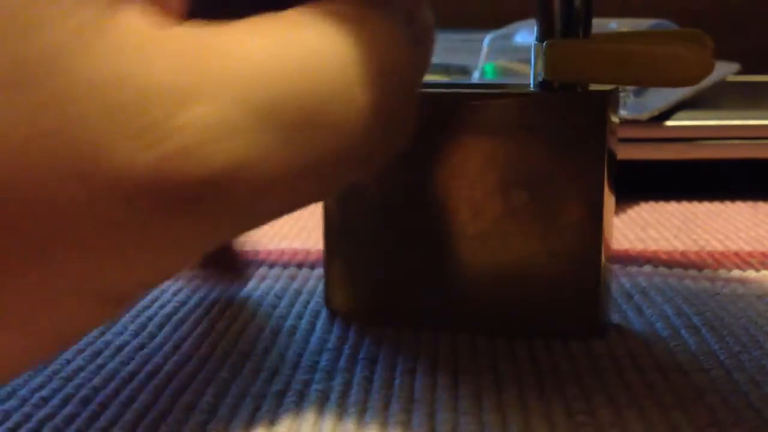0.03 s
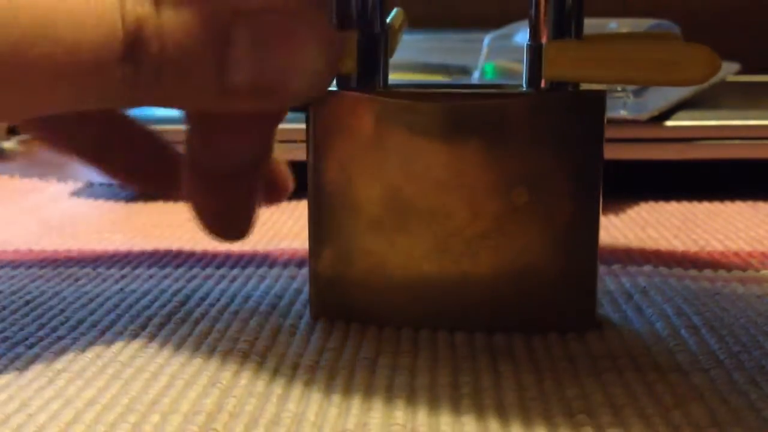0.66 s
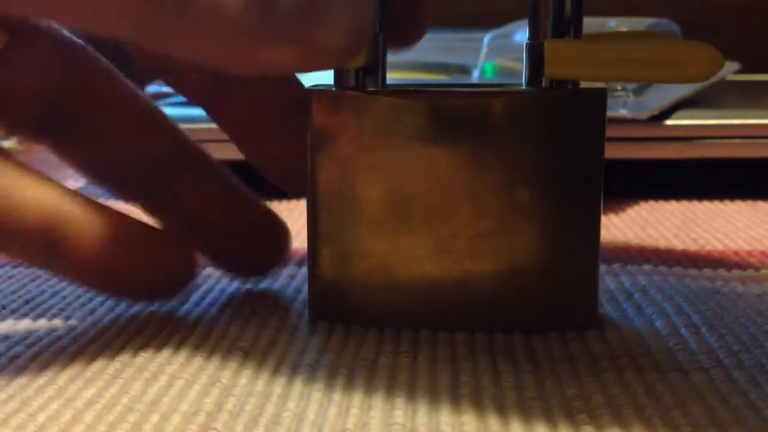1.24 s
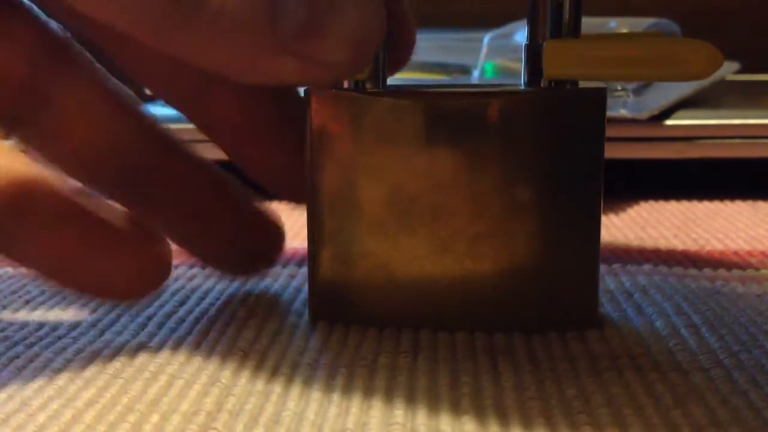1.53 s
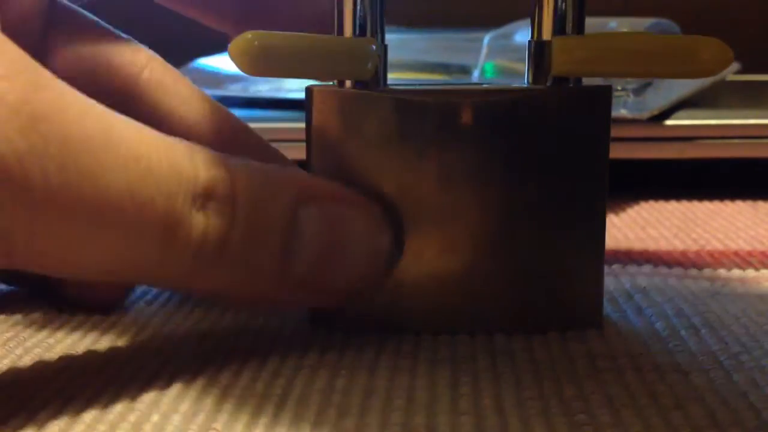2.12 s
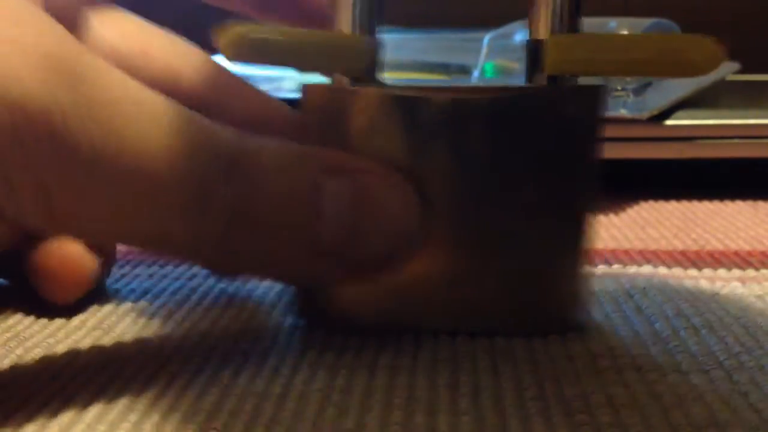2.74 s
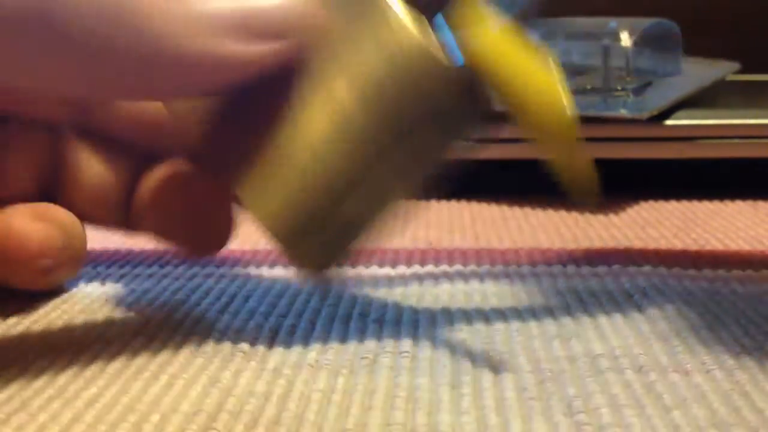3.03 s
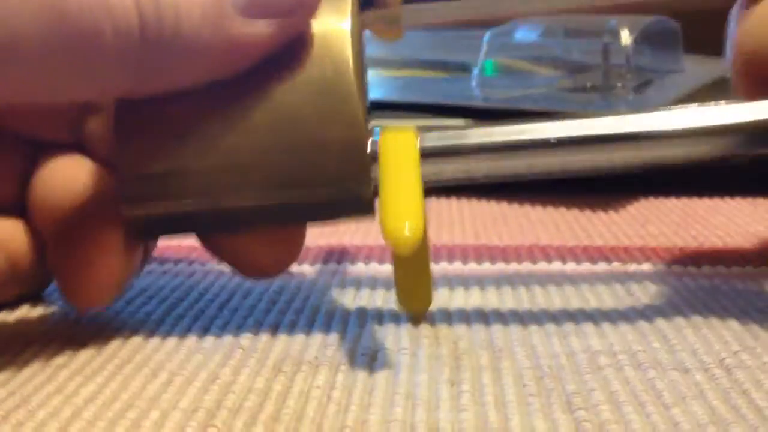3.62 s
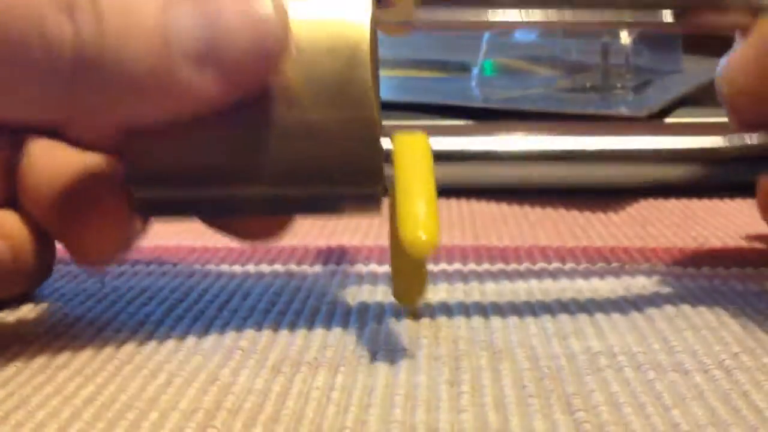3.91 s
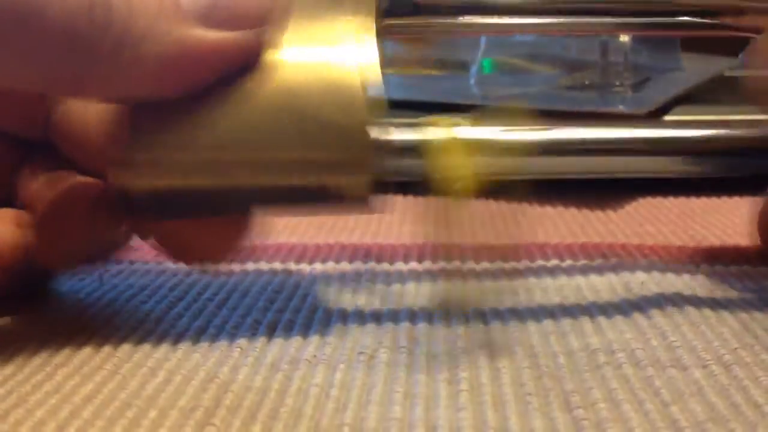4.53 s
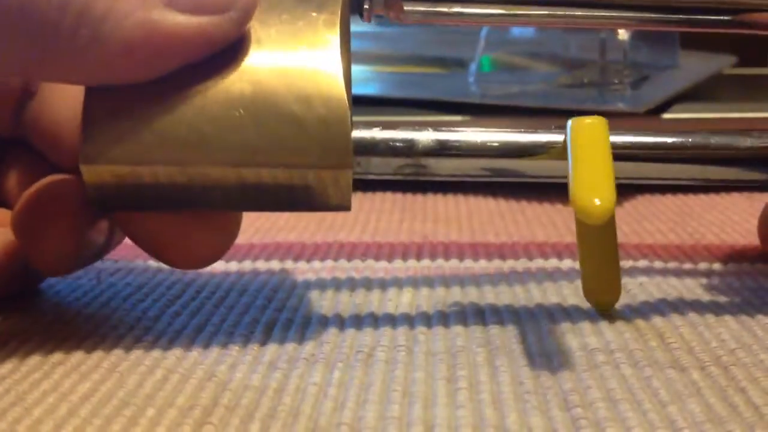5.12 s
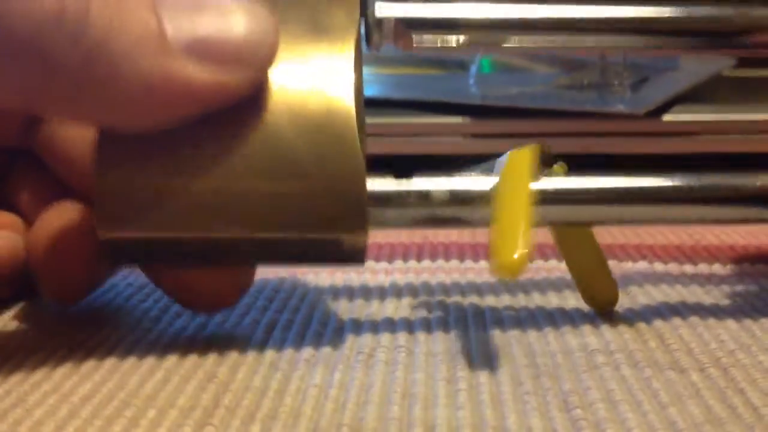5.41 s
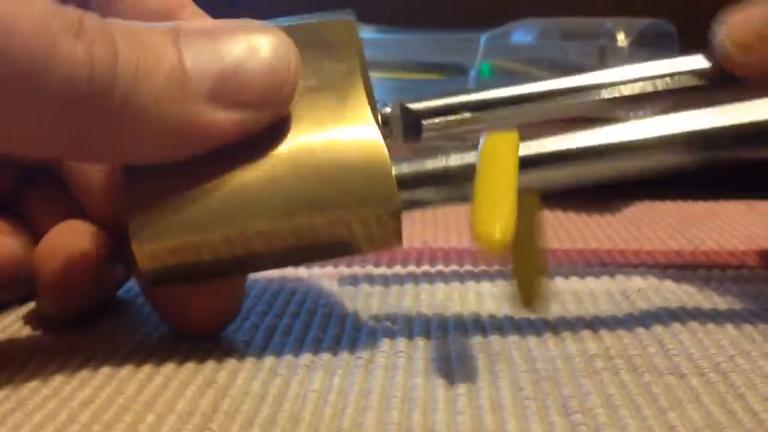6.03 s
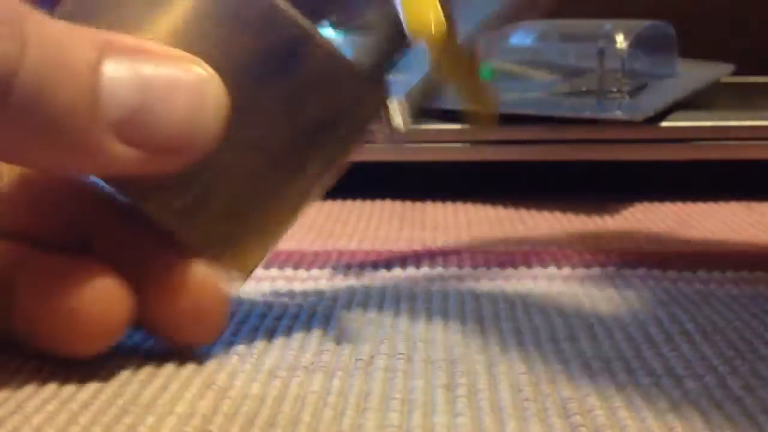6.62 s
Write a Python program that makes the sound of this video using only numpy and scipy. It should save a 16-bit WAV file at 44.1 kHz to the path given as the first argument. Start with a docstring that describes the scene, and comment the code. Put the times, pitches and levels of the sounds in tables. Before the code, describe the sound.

Steel picks click and scrape inside a brass padlock until the shackle snaps open with a loud, briefly ringing clang.

```python
"""A brass padlock is picked close up until its sprung shackle snaps open, clangs and rings.
Before that, thin steel tools tick and scrape inside it and the pulled shackle creaks.
The lock body knocks and drags on a woven mat on a desk; skin slides over metal and cloth.
Underneath lies quiet room tone, which a limiter ducks on the snap and slowly lets back."""
import sys
import numpy as np
from scipy import signal
from scipy.io import wavfile
from scipy.ndimage import uniform_filter1d

SR = 44100
rng = np.random.default_rng(int(sys.argv[2]) if len(sys.argv) > 2 else 0)


def persist_wave(psi):
    """Save psi, clipped to +-1, as 16-bit WAV."""
    counts = np.round(np.clip(psi, -1, 1) * 32767).astype(np.int16)
    wavfile.write(sys.argv[1], SR, np.atleast_2d(counts).T)


N = 298116
LIFT_S = 2.8  # the lock leaves the mat


def amp(db):
    """Decibels to gain."""
    return 10 ** (np.asarray(db) / 20)


def unit_rms(x):
    """Scales to an rms of one."""
    return x / np.sqrt(np.mean(x ** 2) + 1e-20)


def curve_at(points, hz):
    """Reads a curve on a log-frequency axis."""
    f, value = np.transpose(points)
    return np.interp(np.log(hz + 1), np.log(f + 1), value)


def add(mix, s, sound):
    """Mixes a sound in at time s."""
    part = mix[round(s * SR):][:len(sound)]
    part += sound[:len(part)]


def equalise(x, eq, tilt=0, size=2048):
    """Minimum-phase EQ, its treble tilted in dB per octave."""
    hz = abs(np.fft.fftfreq(size, 1 / SR))
    log_gain = np.log(amp(curve_at(eq, hz) + tilt * np.log2(1 + hz / 1000)))
    response = np.exp(np.conj(signal.hilbert(log_gain)))
    return signal.oaconvolve(x, np.fft.ifft(response).real[:size // 2])


def burst(decay_s, eq, tilt=0, size=4096):
    """A hard hit: countless modes dying at once, with the energy of one millisecond at unit level."""
    t = np.arange(size) / SR
    x = equalise(rng.choice([-1., 1.], size) * np.exp(-t / decay_s), eq, tilt)
    return x / np.linalg.norm(x) * np.sqrt(SR / 1000)


def ring(modes):
    """Damped sines of a struck object: low modes start from rest, high ones at any phase."""
    t = np.arange(SR // 2) / SR
    return sum(amp(db - 60 * t / t60) * np.sin(2 * np.pi * (hz * t + (hz > 1000) * rng.random()))
               for hz, db, t60 in modes)


def noise(eq, patchy_db):
    """Noise of unit level whose spectrum drifts in small patches."""
    hz = np.fft.rfftfreq(1024, 1 / SR)
    real, imag, patches = rng.standard_normal((3, len(hz), N // 256 + 5))
    patches = uniform_filter1d(patches, size=20, axis=0)
    patches = unit_rms(uniform_filter1d(patches, size=7, axis=1))
    bins = (real + 1j * imag) * amp(curve_at(eq, hz)[:, None] + patchy_db * patches)
    return unit_rms(signal.istft(bins, nperseg=1024, noverlap=768)[1][:N])


def swells(moves, peak, curve):
    """Friction envelope: each move speeds up for the share `peak` of its length, then slows to rest."""
    out = np.zeros(N)
    for start, length, db in moves:
        progress = (np.arange(max(start, 0), start + length, 1 / SR) - start) / length
        speed = abs(np.sin(np.pi * np.interp(progress, [0, peak, 1], [0, .5, 1])))
        add(out, max(start, 0), amp(db) * speed ** curve)
    return out


# low, airy bed (f/Hz, level/dB)
ROOM_TONE_EQ = [(30, -10), (80, -10), (120, 4), (200, 1), (260, -4), (335, 1.5), (450, -4), (780, -12),
                (1300, -10), (2600, -15.5), (6300, -20), (8000, -22), (10000, -26.5), (13000, -22.5)]

def room_tone(level_db=-68):
    """The still room and the microphone's hiss."""
    return amp(level_db) * noise(ROOM_TONE_EQ, patchy_db=0)


# reverb time by band (f/Hz, t60/s)
REVERB_TIMES = [(150, 0.74), (1000, 0.32), (4000, .27), (9000, .24), (15000, .19)]

def reverb(x, build_s=0.0028):
    """Diffuse tail of a small furnished room, the treble dying first."""
    hz, t, bins = signal.stft(rng.standard_normal(SR // 2), SR, nperseg=256)
    decay = amp(-60 * t / curve_at(REVERB_TIMES, hz)[:, None])
    tail = signal.istft(bins * decay, SR, nperseg=256)[1]
    tail *= 1 - np.exp(-(np.arange(len(tail)) / SR / build_s) ** 2)
    return signal.fftconvolve(x, tail / np.linalg.norm(tail))[:N]


def reflections(x, delay_s=.0074, bounce_db=-7, dull_hz=1300):
    """A nearby surface throws the lows back, twice."""
    dull = signal.sosfilt(signal.butter(2, dull_hz, fs=SR, output="sos"), x)
    out = np.zeros(N)
    for trip in (1, 2):
        add(out, trip * delay_s, (-amp(bounce_db)) ** trip * dull)
    return out


# finger strokes over the brass (t/s, length/s, relative level/dB, fizz boost/dB)
STROKES = [(-.04, .15, -60.5, 3), (.11, .1, -70.5, -4), (1.03, .07, -71, 0), (1.13, .09, -66.5, 2),
           (1.21, .11, -67.5, 1), (1.63, .15, -59.5, 1), (1.76, .14, -67.5, 0), (1.93, .13, -66.5, 1),
           (2.03, .115, -58, 2), (2.27, .19, -66, -2), (2.575, .05, -67, 0), (2.66, .1, -69.5, -3),
           (2.78, .07, -72, -4), (2.85, .21, -63, -8), (3.12, .13, -68, -5), (3.25, .15, -71, -7),
           (3.405, .06, -57.5, 0), (3.45, .06, -64, -1), (3.53, .21, -65, -1), (3.73, .12, -71, -6),
           (3.83, .1, -66.5, -2), (3.93, .2, -70, -2), (4.15, .45, -76, -4), (5.3, .48, -76, -6),
           (6.18, .11, -67.5, -3), (6.33, .08, -69, -3), (6.49, .18, -62.5, -4), (6.68, .11, -70, -3)]
# bright hiss of skin on brass (f/Hz, level/dB)
SKIN_EQ = [(530, -40), (900, -4.5), (1260, -1), (1590, -9), (2720, -2.5), (3300, -4), (4710, -2),
           (5500, -3.5), (8200, -4.5), (10500, -9), (13600, -9), (15500, -14.5)]
# shifts of the grip (t/s, length/s, level/dB)
REGRIPS = [(-.08, .25, -62.5), (1.5, .42, -65), (2.03, .13, -66.5), (2.24, .3, -67.5), (2.48, .3, -63.5),
           (3.18, .36, -67), (3.52, .25, -62.5), (3.84, .33, -67.5), (5.22, .36, -70.5), (5.82, .88, -69.3)]
# dry cloth rustle of the grip (f/Hz, level/dB)
CLOTH_EQ = [(60, -32), (130, -3), (330, 4), (600, -0.5), (1100, -8), (2100, -6.5), (3000, -14),
            (6500, -15.5), (10000, -24.5), (15000, -28.5)]

def hand(slide_db=-1, rest_db=-72.5, grain_db=1.5, fizz_hz=9000):
    """Skin hisses on brass and rustles on the weave, catching unevenly."""
    catching = amp(grain_db * unit_rms(uniform_filter1d(rng.standard_normal(N), size=130)))
    skin = noise(SKIN_EQ, patchy_db=1)
    slide = np.zeros(N)
    for band in ("low", "high"):  # hiss below the crossover, dry fizz above
        layer = signal.sosfilt(signal.butter(5, fizz_hz, band, fs=SR, output="sos"), skin)
        moves = [(s, length, db + (band == "high") * boost) for s, length, db, boost in STROKES]
        slide += layer * swells(moves, peak=.56, curve=.75)
    grip_gain = np.hypot(swells(REGRIPS, peak=.55, curve=.8), amp(rest_db))
    rustle = grip_gain * noise(CLOTH_EQ, patchy_db=3)
    return catching * (amp(slide_db) * slide + rustle)


# pushes of the lock across the mat (t/s, length/s, level/dB)
DRAGS = [(1.41, .135, -46.5), (1.53, .14, -58.5)]
# muffled rub of the weave (f/Hz, level/dB)
MAT_EQ = [(110, -6), (200, 8), (300, -2), (700, -2.5), (1000, -12), (1500, -10.5), (2000, -28), (4000, -44),
          (15000, -55)]

def mat_drags():
    """The base of the lock rubs over the ribs of the mat."""
    return swells(DRAGS, peak=.6, curve=.7) * noise(MAT_EQ, patchy_db=3)


# dull thuds on the mat and in the hand; the rows at 4.7535 and 4.761 s strengthen the throw-back of the 4.7456
# s blow from a nearby surface (t/s, level/dB, f/Hz)
KNOCKS = [(.2428, -39, 553), (.293, -41, 520), (.3214, -38, 500), (.3335, -37, 500), (.395, -36, 500),
          (.414, -31, 417), (.622, -47, 220), (1.1705, -40, 185), (1.4107, -33, 560), (1.4384, -27, 490),
          (1.4669, -30.5, 600), (1.4843, -26, 580), (1.513, -36, 480), (1.5594, -32.5, 680),
          (1.843, -46, 168), (1.875, -50, 130), (3.4374, -37, 330), (3.459, -45, 300), (3.691, -46, 277),
          (4.616, -22, 140), (4.7456, -27, 480), (4.7535, -29, 500), (4.761, -36, 500), (4.8828, -34, 480),
          (4.9246, -24, 300), (4.949, -42, 340)]
# boom of the desk top (f/Hz, relative level/dB, t60/s)
DESK_MODES = [(127, -25, 0.18), (199.8, -17, 0.15), (395, -22, 0.15), (512, -20, 0.12), (654, -26, 0.11)]

def body_knocks(rise_cycles=0.51):
    """Each cushioned blow is a swing or two of pressure; while the lock stands, the desk rings too."""
    out, t = np.zeros(N), np.arange(SR // 2) / SR
    for s, db, hz in KNOCKS:
        rise = t * hz / rise_cycles
        blow = -(rise * np.exp(1 - rise)) ** 2 * np.sin(2 * np.pi * hz * t)
        add(out, s, amp(db) * (blow + (s < LIFT_S) * ring(DESK_MODES)))
    return out


# resonances that voice the creak (f/Hz, width/Hz, relative level/dB)
CREAK_BANDS = [(662, 130, 0), (1060, 80, -9), (1500, 70, -8), (1820, 190, -4), (3070, 220, -6)]

def shackle_creak(start_s=3.592, length_s=.112, level_db=-52.5, slips_per_s=700, spread_db=3):
    """The pulled shackle sticks and slips against the tools; each slip rings the lock."""
    slips = (rng.random(N) < slips_per_s / SR) * amp(spread_db * rng.standard_normal(N))
    voice = sum(amp(db) * signal.lfilter(*signal.iirpeak(hz, hz / width, fs=SR), slips)
                for hz, width, db in CREAK_BANDS)
    return swells([(start_s, length_s, level_db)], peak=.5, curve=.4) * unit_rms(voice)


# gritty tool slides (start t/s, end t/s, level/dB, tilt/(dB/octave), squeak f/Hz, squeak boost/dB)
SCRAPES = [(.218, .306, -57, -.5, 525, 14), (.287, .397, -48, -.5, 530, 12),
           (.391, .432, -43.5, -1, 453, 4), (.426, .486, -56, -.5, 1200, -4),
           (.613, .654, -46, -1, 1300, 8), (2.278, 2.725, -74.5, 0, 2100, 30),
           (2.575, 2.644, -68.5, -6, 2170, 15)]
# midrange rasp of sliding steel (f/Hz, level/dB)
SCRAPE_EQ = [(120, -14), (300, -7), (560, 1), (700, 1), (840, -6), (1050, 0.5), (1450, 0), (1620, -7),
             (1870, -1), (2400, -13), (3100, -6), (4200, -19), (8000, -28), (15000, -28)]

def tool_scrapes(slips_per_s=2200, spread_db=3, squeak_q=9):
    """Steel on steel: dense uneven slips ring the lock body and one resonance of the sliding part."""
    out = np.zeros(N)
    slips = (rng.random(N) < slips_per_s / SR) * rng.choice([-1, 1], N)
    slips = slips * amp(spread_db * rng.standard_normal(N))
    for start, end, db, tilt, squeak_hz, squeak_db in SCRAPES:
        n = int((end - start) * SR)
        grit = slips[round(start * SR):][:n] * signal.windows.tukey(n, .22)
        rasp = equalise(grit, SCRAPE_EQ, tilt)
        squeak = signal.lfilter(*signal.iirpeak(squeak_hz, squeak_q, fs=SR), rasp)
        scrape = rasp + amp(squeak_db) * squeak
        add(out, start, amp(db) * scrape * np.sqrt(n / (np.sum(scrape ** 2) + 1e-20)))
    return out


# tiny metal contacts of tools and lock (t/s, level/dB, tilt/(dB/octave))
TICKS = [(.1975, -43.5, -3), (.2313, -45, -8), (.2426, -34, -3.2), (.2703, -40.5, -4), (.2932, -39.5, -5),
         (.3027, -36.5, -1), (.3108, -31, 4), (.3173, -31.5, 1), (.321, -32.5, .5), (.3274, -32, 1),
         (.3328, -35, .5), (.3488, -42, -3), (.368, -35, 4), (.3783, -27, .7), (.385, -36, 1),
         (.394, -30, 0), (.3973, -33, 2), (.4003, -36, 3), (.4137, -35, 0), (.4515, -36.5, -6),
         (.5747, -51.5, -2.5), (.6206, -43, -4), (.6398, -47.5, -2.5), (.979, -42.5, 0), (3.004, -59, -3),
         (3.2148, -55, -5), (3.4374, -46, -1), (3.4584, -51, -3), (3.57, -47.5, -6), (4.8814, -44, -4)]
# crisp steel click (f/Hz, level/dB)
TICK_EQ = [(100, -16), (250, -5.5), (700, 2), (1500, 1), (1850, 1.5), (2500, -1.5), (3500, 0), (5200, -2),
           (8000, 0.5), (10500, -6.5), (13500, -7), (15500, -1)]
# plastic handles bumping the lock (t/s, level/dB)
HANDLE_TAPS = [(1.56, -48), (3.608, -45), (4.748, -33.5), (4.882, -35), (4.9239, -32.5), (5.0617, -56),
               (5.0837, -55), (5.168, -57.5), (5.273, -51.5), (5.3204, -51.5), (5.5796, -53.5)]
# hollow knock of a handle (f/Hz, level/dB)
HANDLE_EQ = [(150, -10.5), (500, 0.5), (1000, -0.5), (1600, 1), (2600, -7.5), (3800, -13.5), (5500, -25),
             (9000, -36), (15000, -46)]

def tool_ticks(tick_decay_s=.0011, tap_decay_s=.0012):
    """Tools catch in the lock and their handles tap it, all damped by the fingers."""
    out = np.zeros(N)
    for s, db, tilt in TICKS:
        add(out, s, amp(db) * burst(tick_decay_s, TICK_EQ, tilt))
    for s, db in HANDLE_TAPS:
        add(out, s, amp(db) * burst(tap_decay_s, HANDLE_EQ))
    return out


# attack: the latch lets go and the shackle slides out (t/s, level/dB, decay/s, tilt/(dB/octave))
LATCH_CRACKS = [(4.6072, -21.5, 0.0011, 1.5), (4.608, -2.5, .0013, .5), (4.6102, -2.5, .001, 1.5),
                (4.6131, -8, .002, 0.5), (4.616, 2, .004, -3)]
# hard, bright edge of the latch (f/Hz, level/dB)
LATCH_EQ = [(80, -30), (150, -13), (400, -9), (800, -9), (1100, 2.5), (2000, -0.5), (4500, 0.5), (6100, -1),
            (7500, 4), (9500, -1), (11000, -4.5), (13300, 3.5), (15000, 4.5)]
# body: clusters of fast-dying modes as the shackle chatters on its stop (f/Hz, level/dB)
CLANG_EQ = [(130, -15), (800, -14), (1300, -1), (1600, -7), (2900, -13), (3520, 2.5), (4200, -9.5),
            (5350, -9), (5580, 8), (5850, -8.5), (6300, -17), (7800, -9), (8500, 0), (9500, -19.5),
            (10120, -2.5), (10800, -23.5), (12000, -14), (12480, -3), (13000, -10), (15000, -13.5)]
# tail: the ring of the shackle (f/Hz, relative level/dB, t60/s)
SHACKLE_MODES = [(1090, -9, .025), (1340, -4.5, .035), (3495, -26, .16), (3560, -9, .035), (5565, 0, .04),
                 (5535, -23, .2), (5575, -23, .22), (5607, -22, .29), (5636, -23, .26), (8670, -21, .13),
                 (10090, -14, .05), (12420, -24.5, .13), (12790, -26, .14)]

def shackle_snap(stop_s=4.616, clang_db=3.5, clang_decay_s=.009, ring_db=-6.5):
    """The latch cracks free; the spring throws the shackle against its stop, where it clangs and rings."""
    out = np.zeros(N)
    for s, db, decay_s, tilt in LATCH_CRACKS:
        add(out, s, amp(db) * burst(decay_s, LATCH_EQ, tilt))
    add(out, stop_s, amp(clang_db) * burst(clang_decay_s, CLANG_EQ))
    add(out, stop_s, amp(ring_db) * ring(SHACKLE_MODES))
    return out


def scene(metal_send_db=-18, snap_send_db=-19.5, thud_send_db=-19):
    """Mono mix: lock, tools and hand up close, with a little reverb, over the room tone."""
    metal = tool_ticks() + tool_scrapes() + shackle_creak()
    thuds = body_knocks() + mat_drags()
    snap = shackle_snap()
    standing = np.arange(N) < LIFT_S * SR
    early = reflections(standing * metal + thuds)
    wet = reverb(amp(metal_send_db) * metal + amp(snap_send_db) * snap + amp(thud_send_db) * thuds)
    return (room_tone() + wet + early + hand() + thuds + metal + snap)[None]


def record(dry, threshold_db=-12, release_db_per_s=8.5, low_cut_hz=114, high_cut_hz=15420):
    """Low cut, a limiter that clamps at once and releases slowly, then a steep high cut."""
    x = signal.sosfilt(signal.butter(6, low_cut_hz, "high", fs=SR, output="sos"), dry[0])
    power_db = 10 * np.log10(abs(uniform_filter1d(x ** 2, size=150)) + 1e-12)
    release_db = release_db_per_s * np.arange(N) / SR
    held_db = np.maximum.accumulate(power_db + release_db) - release_db
    reduction_db = np.maximum(held_db - threshold_db, 0)
    x = x / amp(uniform_filter1d(reduction_db, size=60))
    high_cut = signal.firwin(301, high_cut_hz, window=("kaiser", 8), fs=SR)
    return signal.oaconvolve(x, high_cut, "same")[None]


dry = scene()
out = record(dry)
persist_wave(out)
```